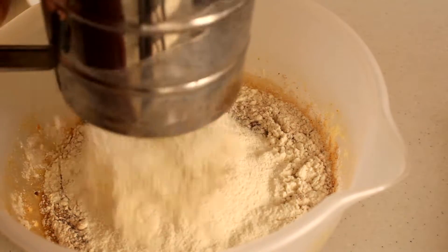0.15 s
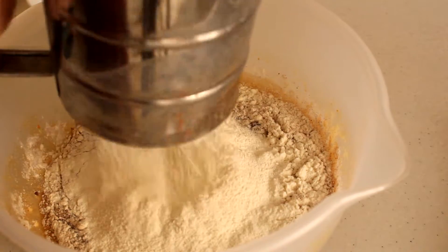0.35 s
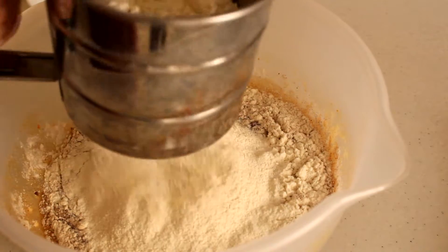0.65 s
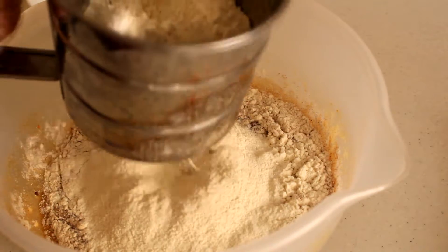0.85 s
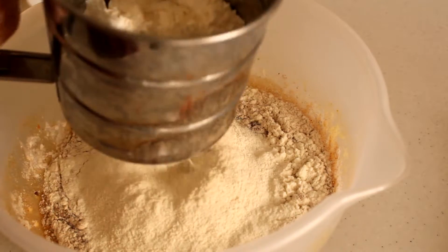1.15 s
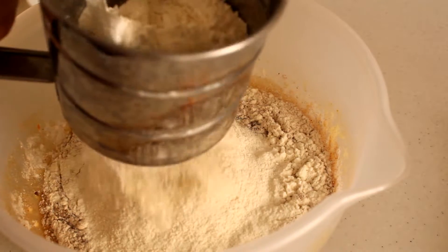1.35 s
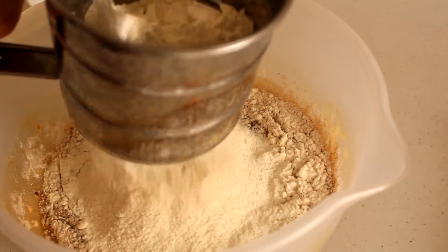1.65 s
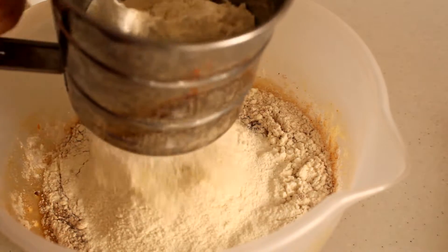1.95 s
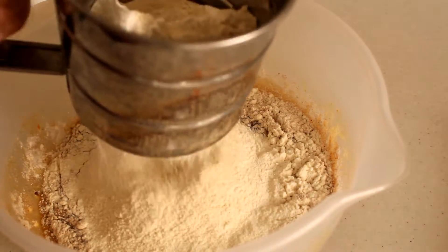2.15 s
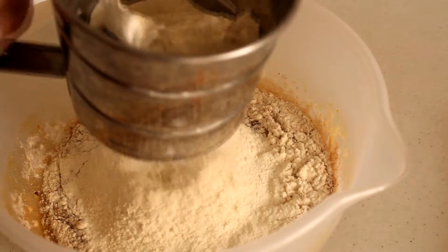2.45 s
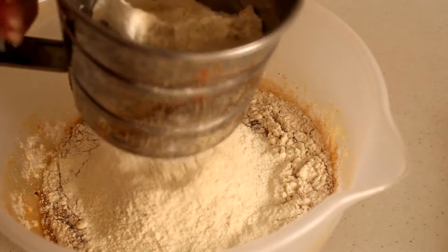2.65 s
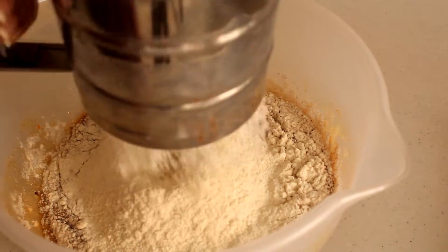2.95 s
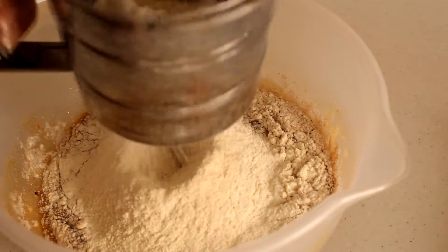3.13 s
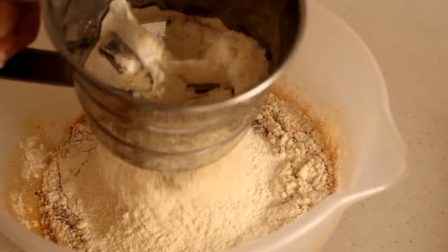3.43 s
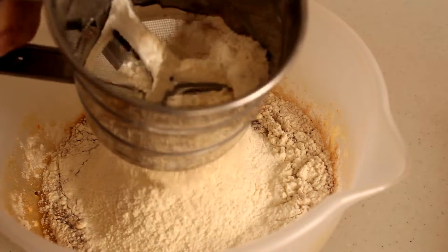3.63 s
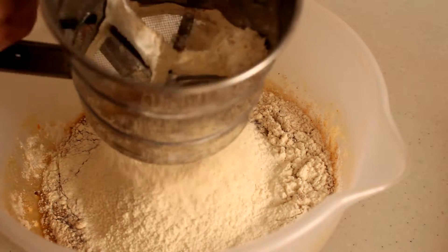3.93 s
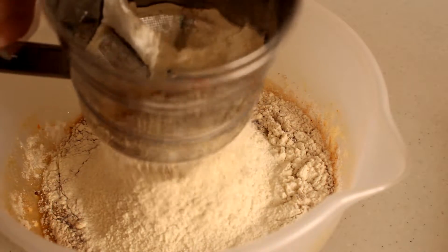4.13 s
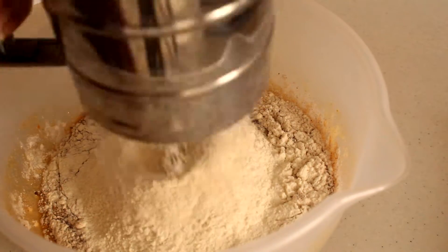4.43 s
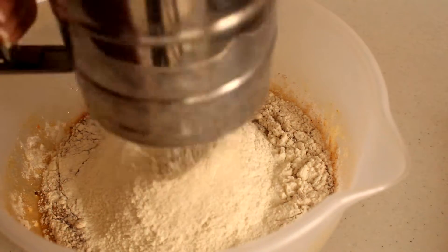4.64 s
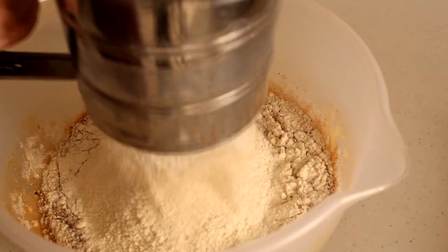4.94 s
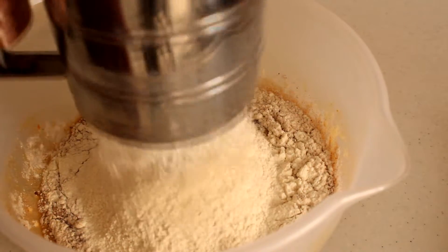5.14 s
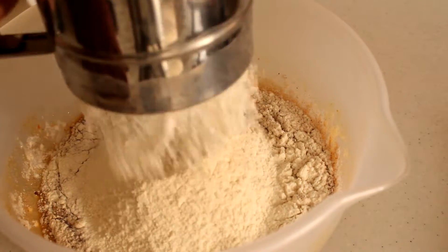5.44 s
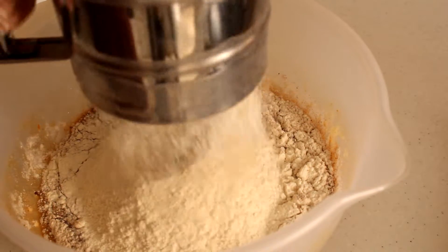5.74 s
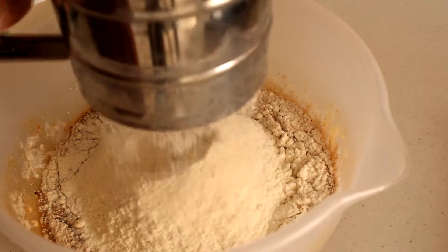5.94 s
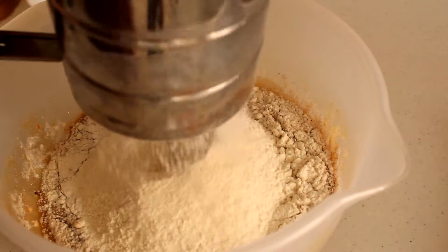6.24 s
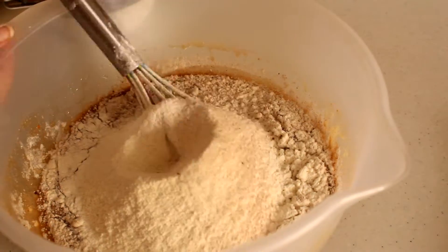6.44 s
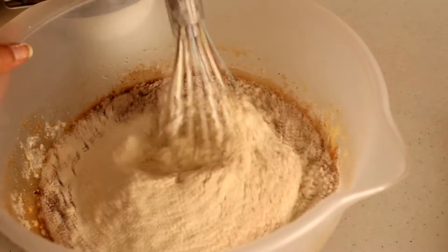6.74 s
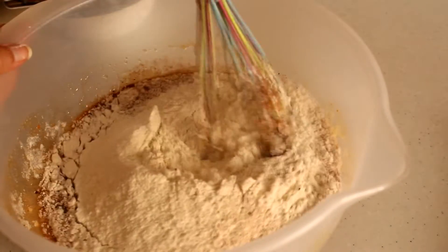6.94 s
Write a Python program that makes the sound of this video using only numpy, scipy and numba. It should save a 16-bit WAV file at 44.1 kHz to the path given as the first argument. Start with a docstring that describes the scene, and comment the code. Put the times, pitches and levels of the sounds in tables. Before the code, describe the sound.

Very close to the microphone, a metal flour sifter is squeezed quickly: a bright lever clack, a lighter spring tick and gritty swishes of wire on mesh between. The cup rings hollowly. There is a short hesitation near three seconds and another after four and a half, then harder, louder strokes until a quick fade. Small hard-walled kitchen, low fridge hum.

```python
"""A steel flour sifter, worked by a hand squeezing its lever over a bowl in a small kitchen.
Each squeeze clacks the lever and each release ticks: noise bursts with decaying steel modes.
In between, wire blades sweep the mesh: uneven grit that rings the cup's wall and the air inside it.
Room echo, fridge hum, deep rumble and a dull knocking lie behind. The camera's gain control
ducks everything after loud strokes at the microphone; the sound fades out quickly at the end."""
import sys
import numpy as np
from scipy import signal
from scipy.fft import rfft, irfft, next_fast_len
from scipy.io import wavfile
from scipy.ndimage import uniform_filter1d, minimum_filter1d
from numba import njit

SR = 44100
rng = np.random.default_rng(int(sys.argv[2]) if len(sys.argv) > 2 else 0)


def to_wav(sig):
    """Store sig (one row per channel, or 1-D mono) as 16-bit WAV at the path in sys.argv[1].

    Samples outside -1..1 are clipped; the rate is SR.
    """
    pcm = np.clip(np.atleast_2d(sig), -1, 1) * 32767
    pcm = np.round(pcm).astype(np.int16)
    wavfile.write(sys.argv[1], SR, pcm.T)  # frames by channels


N = 312228
T = np.arange(N) / SR


def undb(db):
    """Decibels to an amplitude factor."""
    return 10 ** (np.asarray(db) / 20)


def unit(x):
    """Scales to rms 1."""
    return x / np.sqrt(np.mean(x ** 2))


def curve(rows, column=1):
    """One column of a table joined by straight lines over time."""
    rows = np.array(rows)
    return np.interp(T, rows[:, 0], rows[:, column])


def colour(x, points):
    """Filters by a (f/Hz, level/dB) spectrum; gain 1 for white noise."""
    size = next_fast_len(len(x))
    hz, db = np.transpose(points)
    bins_hz = np.arange(1, size // 2 + 2) * SR / size
    gain = undb(np.interp(np.log(bins_hz), np.log(hz), db))
    return irfft(rfft(x, size) * unit(gain), size)[:len(x)]


def ring(x, hz, t60):
    """One decaying mode as a two-pole resonator; gain 1 for white noise."""
    r = np.exp(-np.log(1000) / (max(t60, 1e-3) * SR))
    poles = [1, -2 * r * np.cos(2 * np.pi * hz / SR), r * r]
    return signal.lfilter([1, 0, -1], poles, x) * np.sqrt((1 - r * r) / 2)


@njit
def moving_band(x, hz, width):
    """State-variable band-pass with a moving centre and width in Hz."""
    y, band, low = np.empty(len(x)), 0., 0.
    for i in range(len(x)):
        g, k = np.tan(np.pi * hz[i] / SR), width[i] / hz[i]
        v = (band + g * (x[i] - low)) / (1 + g * (g + k))
        band, low, y[i] = 2 * v - band, low + 2 * g * v, k * v
    return y


def walk(rate):
    """Random levels held 1 / rate s and slewed; spread 1."""
    k = int(SR / rate)
    steps = np.repeat(rng.standard_normal(N // k + 1), k)
    return unit(uniform_filter1d(steps, k)[:N])


def blows(events, body, modes, snap_db, crack_t60, scatter_db):
    """Each blow: a snap and a noisy rattle in the part's colour, plus modes with new strengths every time."""
    out, t = np.zeros(N), np.arange(4096) / SR
    hz, db, t60 = np.transpose(modes)[:, :, None]
    for s, level_db, low_db, high_db, length in events:
        strength, detune, phase = rng.standard_normal((3, len(modes), 1))
        fall = -np.log(1000) * t / length
        tones = undb(db + scatter_db * strength) * np.sin(2 * np.pi * (hz * (1 + 0.0089 * detune) * t + phase))
        modes_sum = np.sum(tones * np.exp(fall / t60), axis=0)
        crack = rng.standard_normal(len(t)) * (np.exp(fall / crack_t60) + 1.6 * np.exp(fall / 0.011))
        crack[20] += undb(snap_db)
        blow = (modes_sum + colour(crack, body)) * np.minimum(t / .0003, 1)
        blow = colour(blow, [(2000, low_db), (5000, 0.002), (9000, high_db)])
        blow[-1024:] = 0
        onset_rms = np.sqrt(np.mean(blow[:128] ** 2))
        at = int(s * SR)
        out[at:at + len(t)] += undb(level_db) * blow / onset_rms / 3
    return out


# lever clack at each squeeze: t/s, relative onset level/dB, low colour/dB, high colour/dB, ring length factor
CLACKS = [(0.13, 2, -8.5, -4, 0.55), (0.4392, -3.5, -4, -1, 0.49), (0.7375, -4.5, -4, -4.5, 1.14),
          (1.0707, -5, 0, -4.5, 0.84), (1.3643, -2, -1.5, 1, 0.36), (1.6572, -4.5, 1.5, -7, 0.81),
          (1.9557, -1.5, 3, 0, 0.63), (2.2342, -1.5, 4, -2, 0.86), (2.5287, -4, 4, 1.7, 1.3),
          (2.835, -5, -2.5, 1.5, 1.3), (3.4085, -13, 4.5, 0, 1.9), (3.692, -2.5, 4.5, -0.5, 1.1),
          (3.9499, 1, 2, 0, 1.4), (4.2211, -0.5, 3, -1, 2.2), (4.9537, -3, -3, 2.5, 0.65),
          (5.3035, 1.5, 0, 0, 1.2), (5.5881, 0.5, 1.5, -0.5, 1.9), (5.871, 3, -5, 1, 1.3),
          (6.2201, 0.5, -6.5, 1, 1.8)]
# noisy body of the clack: f/Hz, spectral level/dB
CLACK_BODY = [(530, -38), (900, -9), (1390, -21), (2160, -9), (3150, -8.5), (3560, -7.5), (4070, -8),
              (4950, 0), (6390, -3), (7040, -9), (7570, -4), (8450, -8.5), (10100, -1.5), (14300, -19),
              (16500, -50)]
# lever modes before scatter: f/Hz, level/dB, t60/s before the ring length factor
CLACK_MODES = [(2470, -12.5, .03), (3640, -11, 0.053), (4680, -7.5, .025), (5060, -7.5, .025),
               (5760, -12, 0.035), (6300, -11.5, 0.015), (8000, -13, 0.018), (9440, -11.5, .025),
               (10550, 2.5, 0.013)]


def lever_clacks():
    """The squeezed lever strikes: a bright crack over short steel modes."""
    return undb(6.5) * blows(CLACKS, CLACK_BODY, CLACK_MODES, snap_db=14.0, crack_t60=0.05, scatter_db=3.5)


# spring tick at each release: t/s, relative onset level/dB, low colour/dB, high colour/dB
TICKS = [(0.2669, -7.5, 4, 0.5), (0.576, -10.5, -0.5, 5), (0.913, -29, -5.5, -1), (1.2136, -27, 5.5, -9.5),
         (1.501, -29, 2, -9), (1.8078, -23, -6, -8.5), (2.0887, -29, 0.11, -15), (2.371, -8, -3.5, -0.5),
         (2.6733, -9.5, -2, 0.11), (2.9683, -9, 2, -4.5), (3.5678, -18.5, -3, -2.5),
         (4.3543, -4.5, -4, -4.5), (4.5725, -28.5, -14, -11.5), (4.6572, -17.5, 8, 6.5),
         (5.141, -22.5, -8.5, -2), (5.4394, -4.5, 0.11, 1), (5.7258, -3.5, 0.5, 2), (6.012, -6.5, 7, 5.5),
         (6.1424, -7, 7.5, 6.3), (6.37, -9.5, 1.5, 13)]
# noisy body of the tick: f/Hz, spectral level/dB
TICK_BODY = [(530, -44.5), (900, -14.5), (1960, -9.5), (2590, -8.5), (3430, -2.5), (4020, 0), (4830, -9.5),
             (6310, -16), (8870, 0.5), (9540, -7.5), (10400, -17.5), (11700, -12), (12800, -27.5),
             (15500, -35.5), (16500, -50.5)]
# spring modes before scatter: f/Hz, level/dB, t60/s before the ring length factor
TICK_MODES = [(2990, -7.5, 0.045), (3300, -17, 0.012), (3630, -14, 0.024), (3870, -15, 0.045),
              (8100, -12.5, .012), (8740, -9, 0.022), (9300, -16, .018)]
TICK_LENGTH = 1.02  # ring length factor of every tick


def spring_ticks():
    """The released spring ticks: a crack over modes that vary more from blow to blow than the clack's."""
    events = [(*row, TICK_LENGTH) for row in TICKS]
    return undb(5) * blows(events, TICK_BODY, TICK_MODES, snap_db=12.5, crack_t60=0.038, scatter_db=8.5)


# blade sweeps: full speed at t/s, speed-up/s, hold/s, slow-down/s, scrape level/dB,
# then cup boom level/dB and wall ring level/dB relative to the scrape
SWEEPS = [(0.025, 0.044, 0.0009, 0.045, -23, -2.8, -8), (0.16, 0.036, 0.01, 0.015, -14.5, -5.5, -10),
          (0.34, 0.092, 0.001, 0.037, -25.5, -2.7, -7), (0.467, 0.026, 0.021, 0.018, -18, -5.5, -9.5),
          (0.638, 0.059, 0.016, 0.026, -25.5, -3.5, -8), (0.763, 0.013, 0.021, 0.034, -20.5, -2.5, -7.5),
          (0.982, 0.077, 0.00091, 0.036, -25, -1.5, -8.5), (1.097, 0.019, 0.0081, 0.047, -20, -4, -7.5),
          (1.284, 0.073, 0.001, 0.033, -23.7, -2.4, -9.5), (1.385, 0.027, 0.016, 0.031, -19, -3.5, -9),
          (1.57, 0.069, 0.001, 0.035, -23.5, -4.5, -7.5), (1.681, 0.011, 0.03, 0.016, -17.5, -6.7, -7.6),
          (1.875, 0.056, 0.00091, 0.033, -18.5, -4.5, -9), (1.98, 0.014, 0.0059, 0.038, -14.5, -6, -8),
          (2.141, 0.044, 0.005, 0.04, -20, -3, -8.5), (2.259, 0.015, 0.017, 0.016, -12.5, -6.5, -6),
          (2.439, 0.052, 0.004, 0.022, -17, -7, -7.5), (2.56, 0.021, 0.007, 0.02, -10.5, -6.0, -8),
          (2.727, 0.045, 0.018, 0.018, -18, -7, -6.2), (2.864, 0.028, 0.01, 0.013, -11.5, -5.5, -8),
          (2.995, 0.02, 0.004, 0.024, -22, -2.5, -10), (3.027, 0.035, 0.004, 0.028, -20, -4, -8),
          (3.455, 0.016, 0.001, 0.054, -20, 0, -7.4), (3.606, 0.019, 0.018, 0.03, -21, -3.5, -7.5),
          (3.716, 0.02, 0.01, 0.02, -11.5, -6, -6.5), (3.868, 0.04, 0.013, 0.021, -13, -3, -5.5),
          (3.971, 0.018, 0.021, 0.017, -10.5, -4.5, -9), (4.117, 0.031, 0.023, 0.029, -14.5, -7.5, -9),
          (4.247, 0.026, 0.01, 0.023, -7.5, -10.5, -11.5), (4.403, 0.034, 0.011, 0.029, -12.5, -10.5, -11),
          (4.988, 0.021, 0.0027, 0.034, -10, -5.5, -9), (5.201, 0.041, 0.014, 0.031, -13, -6.5, -9.5),
          (5.328, 0.017, 0.012, 0.017, -6.6, -9.5, -11.5), (5.482, 0.035, 0.01, 0.038, -10, -12, -11),
          (5.614, 0.024, 0.0073, 0.017, -5, -12, -9), (5.775, 0.049, 0.0095, 0.025, -6, -12, -11.5),
          (5.895, 0.017, 0.009, 0.024, -3, -14, -9.5), (6.063, 0.045, 0.0066, 0.039, -7, -13.5, -10),
          (6.15, 0.014, 0.01, 0.064, -32, -1.5, 1.5), (6.245, 0.022, 0.0057, 0.023, -3.5, -18.5, -11.5),
          (6.416, 0.028, 0.0096, 0.024, -3.5, -14.2, -11)]
# drop one speed-up or slow-down time away from full speed; how round the top is
SLACK_DB, SLACK_BEND = 22.5, 1.57
TRICKLE_DB_PER_S = 132  # how fast the loose flour fades after a sweep
# the blades stay still this long after a clack or tick, then catch on
PLAY_S, TAKE_UP_S = 0.0065, 0.0093


def stroke(spread, trickle_db, column=None):
    """Level of all sweeps: blades speed up, hold, slow down, then loose flour trickles on."""
    power = np.full(N, 1e-9)
    for row in SWEEPS:
        s, rise, hold, fall, db = row[:5]
        near = slice(max(int((s - .25) * SR), 0), int((s + .5) * SR))
        early = np.maximum(s - T[near], 0)
        late = np.maximum(T[near] - s - hold, 0)
        slack = early / (max(rise, 1e-3) * spread[0]) + late / (max(fall, 1e-3) * spread[1])
        # levels are doubled in dB because powers add
        shape = undb(-2 * SLACK_DB * slack ** SLACK_BEND)
        shape += (late > 0) * undb(2 * (trickle_db - TRICKLE_DB_PER_S * late))
        last_blow = max([s - 1] + [b[0] for b in CLACKS + TICKS if b[0] < s])
        shape *= np.clip((T[near] - last_blow - PLAY_S) / TAKE_UP_S, 0, 1) ** 2
        power[near] += shape * undb(2 * (db + (row[column] if column else 0)))
    return np.sqrt(power)


# wires on the mesh: f/Hz, spectral level/dB
MESH = [(760, -47.5), (1300, -7), (1430, -2.5), (2010, -4), (2190, -4.5), (2490, -2), (2740, -5.5),
        (5180, 2), (6470, 1), (10100, -1.5), (14200, -19.5), (15300, -41), (16500, -81.5)]
# air in the cup, rising overall as the flour runs out: t/s, f/Hz, width/Hz,
# level of the rustle below it/dB, level of the mesh treble over 11 kHz/dB
CUP_AIR = [(0, 860, 505, -10, -1), (1.3, 912, 450, -6, -3.5), (2.2, 1015, 344, -13, -3),
           (3.3, 990, 332, -14.5, 0.5), (4.2, 1022, 300, -13.5, 0.5), (5.0, 1063, 280, -13.5, 0),
           (6.6, 1130, 298, -20, 0.7)]


def mesh_scrape(high, mid):
    """Wires rasp on the mesh; the two drives share its spectrum, split by slopes at 2700 Hz."""
    hz, db = np.transpose(MESH)
    slope_db = 40 * np.log2(hz / 2700)
    rasp = colour(high, np.c_[hz, db + np.minimum(slope_db, 0)])
    treble = signal.sosfiltfilt(signal.butter(3, 11000, "high", fs=SR, output="sos"), rasp)
    rasp = rasp + (undb(curve(CUP_AIR, column=4)) - 1) * treble
    return rasp + undb(-1.5) * colour(mid, np.c_[hz, db - np.maximum(slope_db, 0)])


def cup_air(boom):
    """The air column answers in a band with steep sides; a little flour rustle lies below it."""
    hz, width = curve(CUP_AIR), 2 * curve(CUP_AIR, column=2)
    band = boom
    for _ in range(3):
        band = moving_band(band, hz, width)
    rustle = colour(boom, [(250, -17.5), (420, -4.5), (530, 1.5), (650, 0.0), (900, -20.0), (2000, -59.5)])
    return undb(12.5) * band + undb(curve(CUP_AIR, column=3)) * rustle


# steel wall of the cup: f/Hz, level/dB, t60/s
WALL = [(1010, -14.5, 0.058), (1130, -25, 0.035), (1895, -12, 0.052), (2022, -13, 0.032),
        (2363, -16, 0.039), (2980, -20.5, 0.035), (3610, -18, .04), (4030, -15.5, 0.016),
        (4450, -28, 0.032), (4727, -23, .03), (5270, -24, .035), (5850, -16, .04), (6460, -25, 0.038),
        (7800, -9, 0.014), (9130, -16, .04), (10400, -22.5, .025)]


def cup_wall(boom, mid, high):
    """Wall modes rung by the grit; moving wires reach each mode only at times."""
    out = np.zeros(N)
    free_db = np.interp(T, [0, 6.5], [-4, 2.1])  # less damped as the flour runs out
    for hz, db, t60 in WALL:
        drive = boom if hz < 1400 else mid if hz < 2700 else high * undb(-8)
        out += undb(db + free_db) * ring(drive * undb(3.6 * walk(10)), hz, t60)
    return out


def sweeps():
    """Wires skip over the mesh as dense uneven grit; it rings the wall and the air in the cup."""
    grit = unit(rng.standard_normal(N) * undb(1.2 * walk(900) + 1.1 * walk(120)))
    # spreads are factors on (speed-up, slow-down): boom and wall start sooner, the wall stops later
    high = grit * stroke((1, 1), trickle_db=-18.5)
    boom = grit * stroke((1.31, 0.99), trickle_db=-16, column=5) * undb(2.4 * walk(45))
    mid = grit * stroke((1.26, 1.28), trickle_db=-15, column=6) * undb(2.5 * walk(45))
    return undb(-0.5) * (cup_air(boom) + mesh_scrape(high, mid) + cup_wall(boom, mid, high))


# the wall now and then sings on after a sweep: t/s, length/s, f/Hz, level/dB
SINGS = [(3.054, 0.047, 1006, -45), (4.013, 0.029, 2480, -27), (5.015, 0.047, 2400, -27.5),
         (5.239, 0.016, 2464, -35.5), (6.291, 0.014, 2425, -27.5)]


def singing():
    """Near-pure wall tones that waver, hold and die."""
    out = np.zeros(N)
    for s, length, hz, db in SINGS:
        attack = np.clip((T - s) / .004, 0, 1)
        decay = undb(-60 * np.maximum(T - s - length, 0) / 0.045)
        tone = np.sqrt(2) * np.sin(2 * np.pi * hz * T)
        out += undb(db + 1.2 * walk(60)) * attack * decay * tone
    return out


ROOM_T60_S, ROOM_TREBLE_T60_S, ROOM_DB = .45, 0.15, -12


def room(x):
    """Hard kitchen walls: a noisy tail that loses its treble first."""
    t = np.arange(int(.6 * SR)) / SR
    noise = rng.standard_normal(len(t))
    dull = colour(noise, [(300, 11.5), (1000, -7.0), (4000, 0.5), (12000, -21.5)])
    bright = undb(1.5) * colour(noise, [(1000, -0.3), (8000, -4.5), (15000, -14.5)])
    tail = dull * undb(-60 * t / ROOM_T60_S) + bright * undb(-60 * t / ROOM_TREBLE_T60_S)
    tail *= np.minimum(t / 0.0015, 1)
    return undb(ROOM_DB) * signal.fftconvolve(x, tail / np.sqrt(np.sum(tail ** 2)))[:N]


# fridge motor: f/Hz, relative level/dB
HUM = [(100, 0), (149.5, -11), (300, -14)]
# soft hiss: f/Hz, spectral level/dB
KITCHEN = [(45, -29), (70, -15.5), (120, -16.5), (200, -12), (400, -8.5), (700, -15), (1200, -20.5),
           (2000, -23.5), (3500, -33), (6500, -37), (9000, -41), (11500, -48.5), (16000, -73.5)]
# hum and hiss drift together: t/s, level/dB
HUM_DB = [(0, -36.5), (1.4, -39), (2.0, -38.5), (3.1, -40.5), (3.5, -37.5), (4.0, -35), (5.0, -36.5),
          (5.4, -36), (6.0, -35.5), (6.6, -40.5)]


def fridge():
    """Wavering motor tones over a soft hiss."""
    hum = np.zeros(N)
    for hz, db in HUM:
        tone = np.sqrt(2) * np.sin(2 * np.pi * (hz * T + rng.random()))
        hum += undb(db + 1.2 * walk(11)) * tone
    hiss = undb(-5) * unit(colour(rng.standard_normal(N), KITCHEN))
    return undb(curve(HUM_DB)) * (hum + hiss)


# the deep rumble swells: t/s, half width/s, level/dB
SWELLS = [(3.5, .12, -58.5), (4.2, .13, -56), (4.58, .18, -45), (5.3, 0.11, -46.5), (5.87, .07, -60),
          (6.07, .07, -58)]
RUMBLE_DB = -73.5  # between swells


def deep_rumble():
    """Noise around 36 Hz under bell-shaped swells."""
    rumble = unit(colour(rng.standard_normal(N), [(15, -29.5), (25, -16), (36, -3.5), (48, -15.5), (90, -58.5)]))
    swell = undb(RUMBLE_DB) + sum(undb(db) * np.exp(-((T - s) / width) ** 2) for s, width, db in SWELLS)
    return swell * rumble


THUD_S, THUD_DB, THUD_RISE_S, THUD_T60_S = 6.09, -21.5, 0.027, 0.4


def dull_knocking():
    """Uneven noise, strongest near 340 Hz, that rises once and dies away."""
    uneven = rng.standard_normal(N) * undb(2.7 * walk(50.3))
    thud = unit(colour(uneven, [(150, -26.5), (240, 0.0), (340, 7.0), (500, -5.5), (800, -5.5),
                                (1600, -10.5), (3000, -33.5)]))
    rise = np.clip(1 + (T - THUD_S) / THUD_RISE_S, 0, 1)
    return rise * undb(THUD_DB - 60 * np.maximum(T - THUD_S, 0) / THUD_T60_S) * thud


def scene():
    """The sifter and its echo in front, the kitchen behind."""
    sifter = lever_clacks() + spring_ticks() + sweeps()
    background = fridge() + deep_rumble() + dull_knocking()
    return (sifter + room(sifter) + singing() + background)[None]


@njit
def follow(x, e, attack, release):
    """Follows a level from start value e: quickly up, slowly down."""
    out = np.empty(len(x))
    for i in range(len(x)):
        e += (x[i] - e) * (attack if x[i] > e else release)
        out[i] = e
    return out


# peaks over the knee lose this share of their excess in dB; the follower starts at full scale
GAIN_KNEE_DB, GAIN_SLOPE, GAIN_START_DB = -14.5, 0.56, 0
GAIN_ATTACK_S, GAIN_RELEASE_S, GAIN_SLEW_S = 0.0022, 0.28, 0.03
TOP_HZ = 16600
# overall level, steady until the closing fade: t/s, level/dB
FADE = [(6.525, -2.5), (6.537, -23), (6.55, -46), (6.575, -60), (6.6, -120)]


def record(dry):
    """At the microphone: gain control ducks after peaks, the loudest are rounded; fade-out and cut top."""
    peaks = -minimum_filter1d(-np.abs(dry[0]), size=44)  # highest within 1 ms
    heard = follow(peaks, 1. * undb(GAIN_START_DB), 1 / (GAIN_ATTACK_S * SR), 1 / (GAIN_RELEASE_S * SR))
    cut_db = GAIN_SLOPE * np.maximum(20 * np.log10(heard) - GAIN_KNEE_DB, 0)
    keep = np.exp(-1 / (GAIN_SLEW_S * SR))
    slewed_db = signal.lfilter([1 - keep], [1, -keep], cut_db, zi=cut_db[:1])[0]
    ducked = dry * undb(-slewed_db)
    rounded = ducked / (1 + (ducked / .85) ** 6) ** (1 / 6)
    low_pass = signal.ellip(8, .2, 70, TOP_HZ, fs=SR, output="sos")
    return signal.sosfilt(low_pass, rounded * undb(curve(FADE)))


dry = scene()
out = record(dry)
to_wav(out)
```